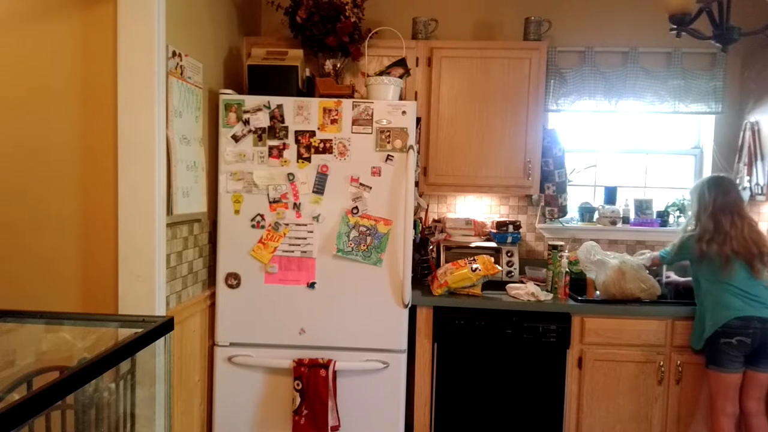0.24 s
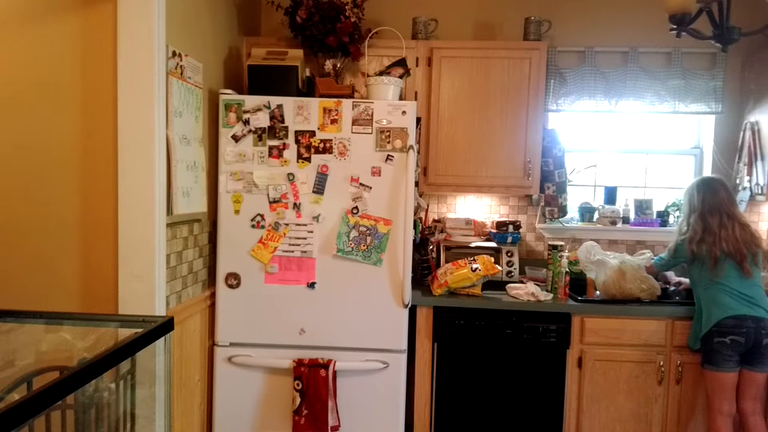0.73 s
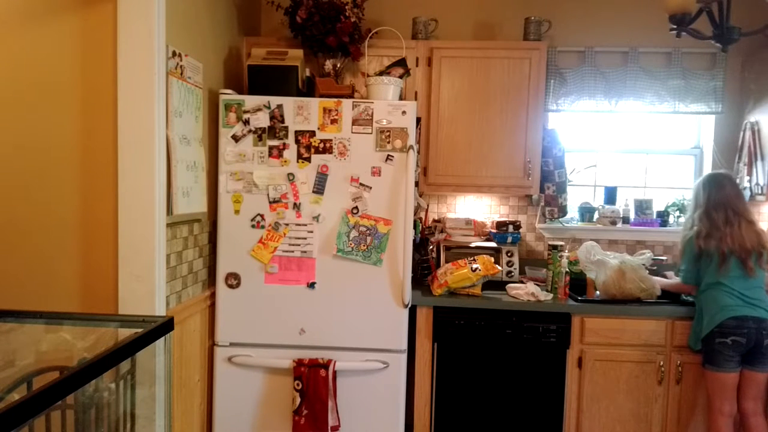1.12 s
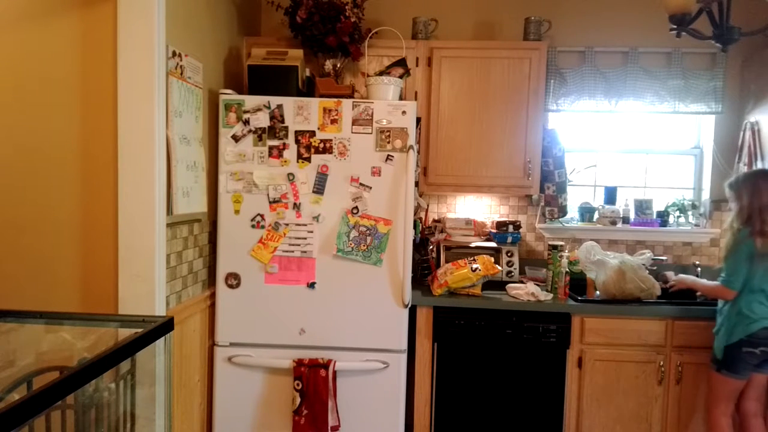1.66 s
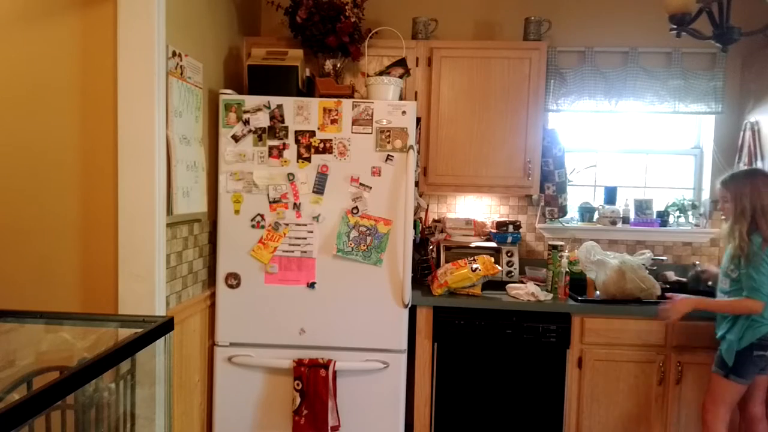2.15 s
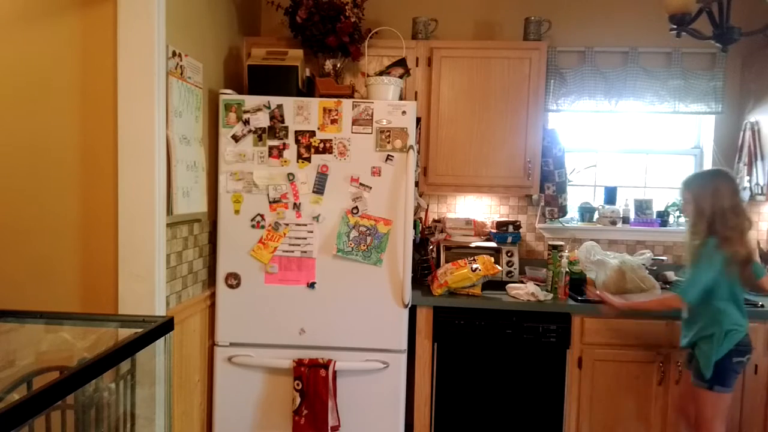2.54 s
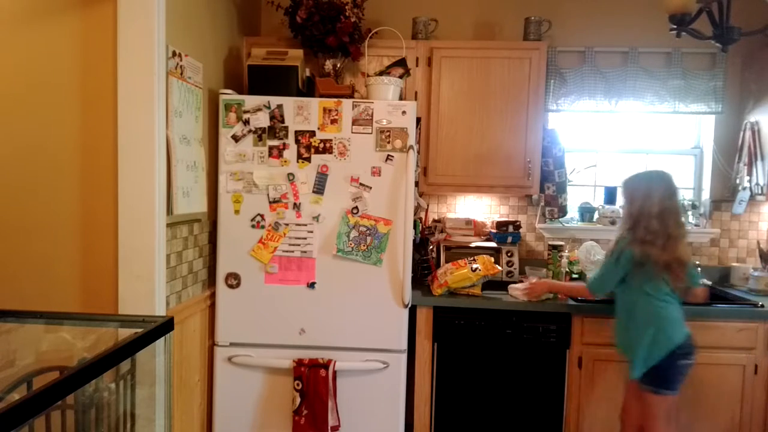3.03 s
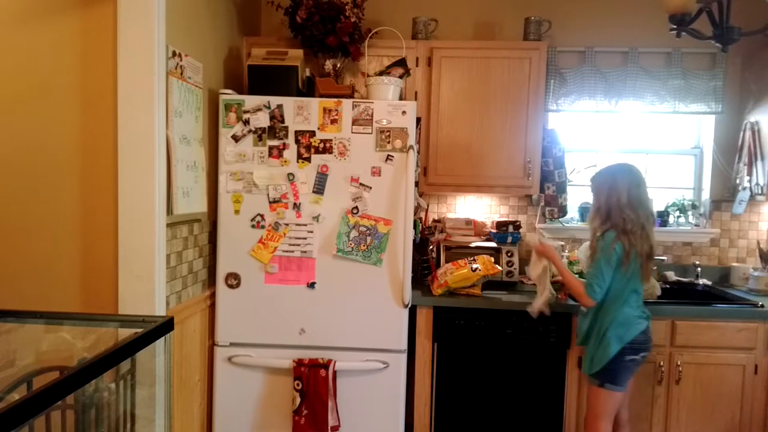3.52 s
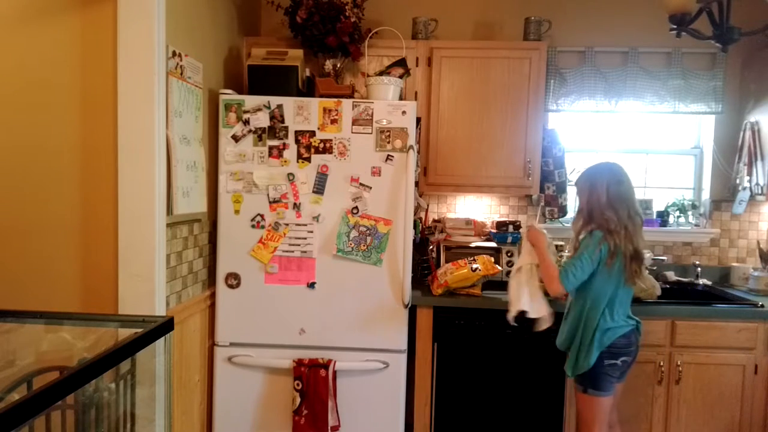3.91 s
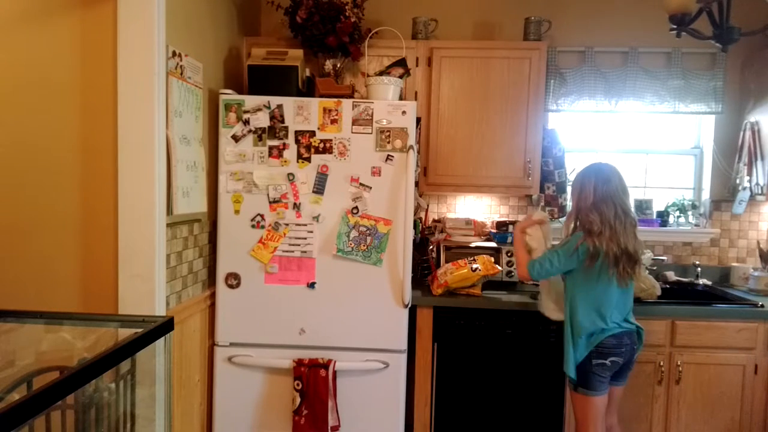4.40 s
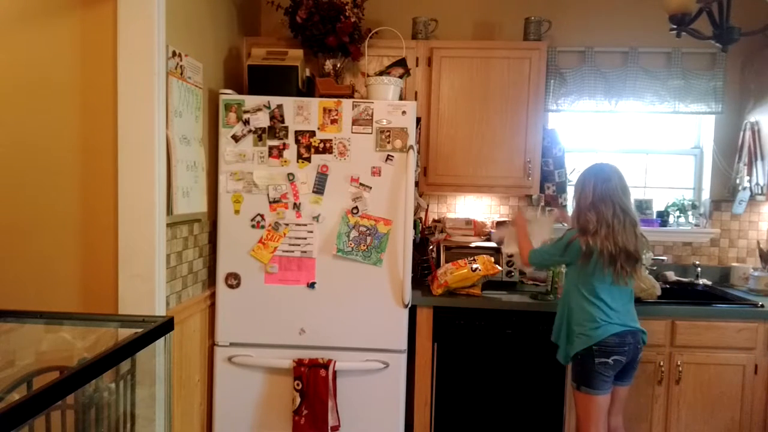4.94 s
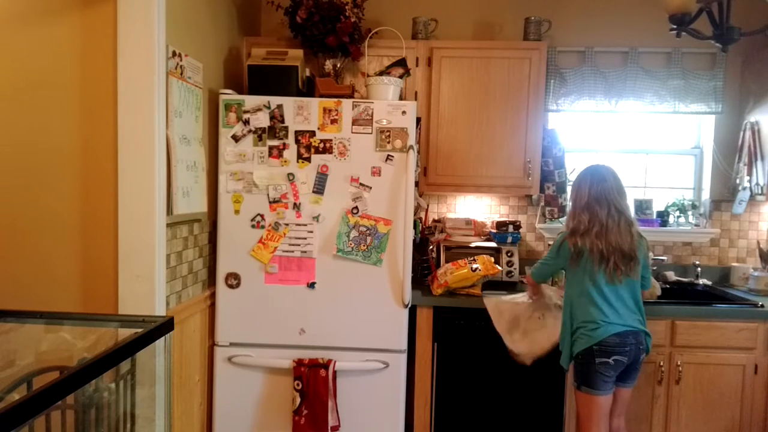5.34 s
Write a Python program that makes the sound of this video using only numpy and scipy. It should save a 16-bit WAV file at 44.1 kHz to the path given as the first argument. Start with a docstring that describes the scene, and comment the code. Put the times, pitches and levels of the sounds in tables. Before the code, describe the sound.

In a small home kitchen, heard from across the room, a tap hisses, splashes and gurgles for about a second, with a thin high whistle as it is shut. Three strong, evenly spaced knocks of a dish on the sink follow. Then come dull footsteps, soft swishes of cloth, a quick run of lighter crockery clacks, and near the end faint steps and another cloth flap. Low hum and faint room noise underneath.

```python
"""A kitchen heard by a far stereo microphone that gets mostly the room, over a low hum and a noise floor.
First a tap hisses, whistles as its valve pinches the jet and is shut, with splashes and gurgling (filtered noise)
and bubbles (rising sines). Then a dish is knocked three times on the sink (ringing modes and a crack).
Feet thud (coloured clicks, floor ring) and a cloth rustles (swells of noise), with a few ticks; crockery
clacks (modes again); a few steps and swishes of cloth close the scene."""
import sys
import numpy as np
from scipy import signal
from scipy.fft import rfft, irfft
from scipy.io import wavfile
from scipy.ndimage import uniform_filter1d

SR = 44100
rng = np.random.default_rng(int(sys.argv[2]) if len(sys.argv) > 2 else 0)


def digitize_waveform(pressure):
    """Quantize a signal to 16-bit integers and store it at the path in sys.argv[1].

    Rows of a 2-D input are taken as channels; values are limited to [-1, 1].
    """
    field = np.atleast_2d(pressure).T
    bounded = np.clip(field, -1, 1)
    quanta = np.round(bounded * 32767).astype(np.int16)
    wavfile.write(sys.argv[1], SR, quanta)


N = 245716

# Levels of events are source levels, ahead of the room and the microphone. Spectra are in dB per Hz.
# steady noise floor of the place: pitch_hz, level_db
FLOOR_SPECTRUM = [(18, -42), (30, -20), (53, -5.5), (71, -12), (86, -10), (161, -11), (188, -14),
                  (294, -13), (326, -16.5), (424, -10), (662, -20.5), (1030, -18.5), (1610, -27),
                  (1890, -30), (15800, -44)]
FLOOR_DB = -59
# low hum: pitch_hz, width_hz, level_db
HUM_PEAKS = [(57.55, 4.2, -66)]

# early echoes from the counter and the near wall: delay_s, level_db over the direct sound
NEAR_ECHOES = [(.0035, 5.5), (.007, 0), (.011, -2)]
# decay of the room's tail: pitch_hz, t60_s
ROOM_DECAY = [(100, 0.4), (500, 0.33), (1500, 0.39), (4000, 0.4), (8000, 0.35), (14000, 0.52)]
# likeness of the left and right noise: pitch_hz, likeness (0 to 1)
STEREO_LIKENESS = [(30, 0.89), (300, 0.87), (640, 0.78), (1400, 0.18), (3100, 0), (15000, 0)]
# balance of the microphone's two ports: pitch_hz, left_minus_right_db
PORT_BALANCE = [(60, 1.5), (110, -2.5), (200, 3.5), (380, 1), (700, 1.5), (1290, 4), (2380, 5.5),
                (4400, -5.5), (8120, -6), (15000, -1)]
BAND_LIMIT_HZ = 15850
OFFSET = .0008  # steady offset of the converter, full scale 1

# swishes of cloth and clothes: peak_s, hiss_level_db, rise_db_per_s, body_over_hiss_db
CLOTH_SWISHES = [(2.335, -69, 901, 3), (2.48, -63.5, 60, 1.5), (2.62, -71, 200, 6.5),
                 (2.81, -67.5, 799.5, 8), (2.99, -64, 899, 8.5), (3.04, -65.5, 300, 1),
                 (3.16, -69, 200, 3.5), (3.45, -68, 498.5, 0.5), (3.56, -72, 400, 6.5),
                 (3.73, -74, 499.5, 4), (5.2, -77.5, 300, 7), (5.34, -78, 900.5, 6), (5.485, -62, 450, 4),
                 (5.57, -59.5, 123, 11.5)]
SWISH_FALL_DB_PER_S = 110
# hiss of the fabric: pitch_hz, level_db
CLOTH_HISS = [(2500, -5.5), (3500, 0), (5500, -3.5), (8000, -3), (10500, -1), (12500, -7), (15800, -9)]
# lower body of the folds: pitch_hz, level_db
CLOTH_BODY = [(350, -7.5), (750, -2), (1500, -3), (2300, -3.5), (3800, -24)]

# feet on the floor: start_s, level_db, centre_hz, slap_db, floor_boom_db
FOOTFALLS = [(2.322, -24, 370, -36, -26.5), (2.973, -37, 500, -28, -2.5), (2.98, -22, 310, -34, -32),
             (3.544, -33.5, 389, -48.5, -23), (4.32, -43.5, 190, -31.5, -25), (5.379, -44, 160, -16.5, -20),
             (5.424, -48.5, 110, -35, -19)]
# ring of the floor boards under a foot: pitch_hz, level_db, t60_s
BOARD_MODES = [(253, -9.5, 0.16), (467.4, -4.5, 0.15), (591, -5, 0.1)]

# crockery clacks: start_s, level_db, ring_db, then the tint of the spot struck: base_db, body_db, edge_db
CLACKS_STRUCK = [(3.777, -28.5, 0, 3, 0, -1.5), (3.811, -33, 1.5, 6.5, 1, -22),
                 (3.832, -33, -8, 7.5, 0.5, -21), (3.892, -35.5, -8, 4.5, 9, -18),
                 (3.945, -32, -12, 7.5, 0.5, 25), (3.9555, -25.5, -13, 1, -12, 10)]
# ringing modes of the crockery: pitch_hz, level_db, t60_s, build_up_s
CROCKERY_MODES = [(638, -10, 0.091, 0.0042), (735, -18, 0.064, 0.0075), (845, -3, 0.14, 0.0032),
                  (1047, -12, 0.051, 0.004), (1492, -8, 0.07, 0.0017), (2310, -26, 0.063, 0.0022),
                  (3990, -22, 0.076, 0.0014), (5545, -19.5, 0.06, 0.0014), (8670, -51, .2, 0.0017)]
# crack of crockery on contact: pitch_hz, level_db
CROCKERY_CRACK_SPECTRUM = [(59, -31), (100, -14.5), (129, -9.5), (189, -20.5), (254, -10), (522, -7.5),
                           (645, -1.5), (1500, -13), (3510, -28), (15800, -49)]
# centres of the crockery's spot tints: base_hz, body_hz, edge_hz
CROCKERY_SPOTS = (1610, 4000, 10300)

# splashes and small ticks: start_s, level_db, centre_hz, t60_s
SPLASH_BURSTS = [(0.155, -28, 7150, 0.019), (0.312, -44, 6640, 0.032), (0.4523, -35, 9030, 0.036),
                 (0.757, -31.5, 6220, 0.025), (0.792, -27.5, 4200, 0.023), (0.8872, -36, 3280, 0.026),
                 (2.3245, -46.5, 5600, 0.019), (2.468, -50, 8400, 0.037), (2.798, -53, 8800, 0.076),
                 (2.812, -62.5, 10100, 0.05), (3.0006, -54, 9200, 0.061), (5.3394, -64.5, 6100, 0.062)]
# bubbles and drips: start_s, level_db, starting pitch_hz
BUBBLE_DRIPS = [(.512, -48.5, 2140), (0.572, -37, 1767), (0.601, -40, 1870), (.612, -39, 2080),
                (0.659, -44, 1415), (0.676, -41, 1055), (1.068, -69, 8260), (1.165, -61, 3300),
                (1.167, -59, 2410), (1.19, -57.5, 2000), (1.195, -65, 3340)]
BUBBLE_T60_S = 0.067

# water leaving the tap, with two spurts: time_s, flow_db
TAP_FLOW = [(0.0, -51), (0.14, -52), (0.166, -46.5), (0.25, -59.5), (0.42, -55.5), (0.496, -44.5),
            (0.7, -46.5), (0.753, -49.5), (0.758, -42), (0.88, -55), (1.05, -85)]
# hiss of the spray: pitch_hz, level_db
SPRAY_SPECTRUM = [(1500, -15), (2700, -4.5), (4500, -2.5), (7500, -6), (10000, -9), (14000, -18.5)]
# hiss of the mist: pitch_hz, level_db
MIST_SPECTRUM = [(5000, -25), (8000, -4), (10500, 1), (14000, -4.5), (15800, -10)]
MIST_DB, MIST_FALL_DB_PER_S, SHUT_S = -5.5, 60, 0.77  # against the flow; it thins faster once the tap is shut
# water in the drain: time_s, gurgle_db, centre_hz of a wandering resonance
DRAIN_WATER = [(0.0, -62, 1600), (0.25, -60.5, 1200), (0.44, -62.5, 1230), (0.496, -53, 1830),
               (0.642, -57, 2080), (0.684, -48, 1240), (0.712, -69, 1200), (0.82, -64, 1900),
               (1.03, -74, 1200)]
# fixed part of the gurgle: pitch_hz, level_db
GURGLE_SPECTRUM = [(700, -0.5), (1000, 4), (1800, 1.5), (2600, -1), (3500, -52)]
# the valve pinching the jet: full_from_s, full_until_s, level_db
VALVE_SQUEEZE = (0.492, 0.63, -38.5)
SQUEEZE_RISE_DB_PER_S, SQUEEZE_FALL_DB_PER_S, SQUEEZE_MIST_DB = 604, 153, -4
# whistling resonances of the valve: pitch_hz, width_hz, level_db
VALVE_WHISTLE = [(9005, 140, 0.5), (9470, 430, -8), (10900, 530, -15), (7260, 140, -12), (6130, 1600, -6.5)]
WHISTLE_ENDS_S, WHISTLE_CUT_DB_PER_S = .69, 700

# dish on the sink: start_s, level_db, ring_db, then the spot's tint: base_db, body_db, edge_db, rim_db
DISH_KNOCKS = [(1.401, -12.5, -5, 5, 5, -5, 2.5), (1.635, -17, 6, 2, -17, -6, 5),
               (1.874, -11.5, 3.5, -2, -2.5, 3, -1.5)]
# ringing modes, with a close pair that swells, then beats: pitch_hz, level_db, t60_s, build_up_s
SINK_MODES = [(297, -27, 0.31, .004), (318, -12, 0.18, 0.0049), (357.6, -9.5, 0.13, 0.0045),
              (526, 14, .175, .14), (531, 14, .175, .14), (616, -32.5, 0.24, 0.0082),
              (604.3, -10.5, 0.18, 0.0016), (707, -28, 0.1, 0.002), (758, -6, 0.072, 0.0065),
              (840, -10, 0.22, 0.0019), (1100, -18.5, .12, .004), (1180, -18.5, 0.075, 0.01),
              (1456, -6.5, 0.12, 0.0046), (1540, -11, 0.15, 0.0012), (1750, -33, .15, 0.0063),
              (1900, -22, 0.11, .004), (2016, -37, .15, .004), (2230, -19, 0.077, 0.0069)]
# crack of the dish on the sink: pitch_hz, level_db
SINK_CRACK_SPECTRUM = [(60, -68), (130, -33), (200, -12), (320, -1.5), (440, -3.5), (600, -2.5),
                       (900, -4.5), (1500, -7.5), (2500, -18.5), (4000, -26), (7000, -40.5), (10000, -47),
                       (15800, -56.5)]
# centres of the sink's spot tints: base_hz, body_hz, edge_hz, rim_hz
SINK_SPOTS = (330, 900, 4000, 10000)
SPOT_OCTAVES = 0.56  # reach of a spot's tint


def gain_of(db):
    """dB to gain."""
    return 10 ** (np.asarray(db) / 20)


def evened(x):
    """Scales to rms 1."""
    return x / np.sqrt(np.mean(x ** 2) + 1e-20)


def read(points, hz):
    """Reads a table on a log-frequency axis."""
    f, value = np.transpose(points)
    return np.interp(np.log(hz + 1), np.log(f + 1), value)


def add(mix, s, sound):
    """Mixes a sound in at time s."""
    part = mix[..., round(s * SR):][..., :sound.shape[-1]]
    part += sound[..., :part.shape[-1]]


def tinted(x, points):
    """Filters by a spectrum in dB."""
    n = x.shape[-1]
    gain = gain_of(read(points, np.fft.rfftfreq(n, 1 / SR)))
    return irfft(rfft(x) * gain, n)


def pair(n):
    """Two noises, alike in the bass and unrelated in the treble."""
    a, b = rfft(rng.standard_normal((2, n)))
    same = np.clip(read(STEREO_LIKENESS, np.fft.rfftfreq(n, 1 / SR)), -1, 1)
    return irfft([a, same * a + np.sqrt(1 - same ** 2) * b], n)


def level(rows, column):
    """A dB column as a gain over time, silent outside its rows."""
    rows = np.array(rows)
    return gain_of(np.interp(np.arange(N) / SR, rows[:, 0], rows[:, column], -200, -200))


def swell(start, end, top_db, rise, fall):
    """A gain that climbs to its top, holds from start to end and falls; slopes in dB per s."""
    t = np.arange(N) / SR
    return gain_of(top_db - rise * np.maximum(start - t, 0) - fall * np.maximum(t - end, 0))


def flicker(depth_db, size):
    """A random gain of the given rms depth, smoothed over size samples."""
    return gain_of(depth_db * evened(uniform_filter1d(rng.standard_normal(N), size)))


def fuzzy_tones(peaks, unsteady_db):
    """Noise through narrow resonances, each coming and going by itself."""
    hz = np.fft.rfftfreq(N, 1 / SR)
    out = np.zeros((2, N))
    for f, width, db in peaks:
        tone = irfft(rfft(pair(N)) / (1 + (2 * (hz - f) / width) ** 2), N)
        out += gain_of(db) * evened(tone * flicker(unsteady_db, size=1500))
    return out


def click(colour):
    """A causal pulse of energy 1 with the colour in dB (minimum phase)."""
    log_gain = np.log(gain_of(read(colour, abs(np.fft.fftfreq(4096, 1 / SR)))))
    pulse = np.fft.ifft(np.exp(np.conj(signal.hilbert(log_gain)))).real[:2048]
    return pulse / np.linalg.norm(pulse)


def room(x, direct_db, tail_db):
    """Direct sound and near echoes, then a diffuse tail dying band by band; each call draws its own tail."""
    hz, t, z = signal.stft(pair(SR // 2), SR, nperseg=256)
    decay = gain_of(-60 * t / read(ROOM_DECAY, hz)[:, None])
    tail = signal.istft(z * decay, SR, nperseg=256)[1]
    t = np.arange(tail.shape[1]) / SR
    tail = tail * np.clip(t / 0.0078, 0, 1) * (1 + 1.14 * np.exp(-t / 0.027))  # soft onset, denser start
    spectrum = rfft(tail)
    spectrum = spectrum / np.sqrt(uniform_filter1d(abs(spectrum) ** 2, size=40))  # a dense room favours no band
    fade_out = np.clip(10 * (t[-1] - t - .1), 0, 1)
    reply = irfft(spectrum, len(t)) * gain_of(tail_db) * fade_out
    for s, db in [(0.0022, 0)] + NEAR_ECHOES:  # the direct sound leads
        add(reply, s + 0.0014 * rng.random(), gain_of([[direct_db + db]]))
    return signal.fftconvolve(x[None], reply, axes=1)


def floor_and_hum():
    """Steady coloured noise of the place, and a low hum made of narrow unsteady noise."""
    floor = gain_of(FLOOR_DB) * evened(tinted(pair(N), FLOOR_SPECTRUM))
    return floor + fuzzy_tones(HUM_PEAKS, 3.4)


def rustle():
    """Grainy friction of fabric, one swell for each swish."""
    hiss = evened(tinted(pair(N), CLOTH_HISS) * flicker(1.6, size=200))
    body = evened(tinted(pair(N), CLOTH_BODY) * flicker(2.4, size=300))
    power = np.array([swell(s, s, db, rise, SWISH_FALL_DB_PER_S) ** 2 for s, db, rise, _ in CLOTH_SWISHES])
    body_power = gain_of(np.array(CLOTH_SWISHES)[:, -1]) ** 2 @ power
    return np.sqrt(power.sum(0)) * hiss + np.sqrt(body_power) * body


def steps():
    """A dull push, a faint slap of the sole and the boards' ring and boom."""
    out, t = np.zeros((2, N)), np.arange(16384) / SR
    for s, db, hz, slap_db, boom_db in FOOTFALLS:
        colour = [(hz * 0.071, -40), (hz * 0.26, -10.5), (hz, 0), (hz * 1.7, -7),
                  (hz * 5.8, slap_db), (12000, slap_db - 48)]
        add(out, s, gain_of(db + 21.5) * room(click(colour), -14.5, 0))
        boom = gain_of(boom_db - 60 * t / .5) * np.sin(2 * np.pi * 33 * t) * np.minimum(t / 0.049, 1)
        ring = sum(gain_of(b_db + read(colour, b_hz) - 60 * t / t60) * np.sin(2 * np.pi * b_hz * t)
                   for b_hz, b_db, t60 in BOARD_MODES)
        add(out, s, gain_of(db) * (boom + ring * np.minimum(t / 0.0065, 1))[None])
    return out


def blows(rows, modes, crack, spot_hz, crack_db, wet_db, direct_db):
    """Each blow rings the modes and sends a crack into the room; the spot struck tints both."""
    out, t = np.zeros((2, N)), np.arange(16384) / SR
    lags = 0.15 * rng.choice([-1, 1], len(modes))  # radians: a mode reaches the two ports a little out of step
    for s, db, ring_db, *spot in rows:
        def tint(hz):
            return sum(d * np.exp(-(np.log2(hz / f) / SPOT_OCTAVES) ** 2) for f, d in zip(spot_hz, spot))
        ring = np.zeros((2, len(t)))
        for (hz, mode_db, t60, build_up), lag in zip(modes, lags):
            envelope = gain_of(mode_db + tint(hz) - 60 * t / t60) * (1 - np.exp(-t / build_up))
            ring += envelope * np.sin(2 * np.pi * hz * t + np.array([[lag], [-lag]]))
        add(out, s, gain_of(db + ring_db) * ring)
        add(out, s, gain_of(db + ring_db) * room(ring[0], -38.5, wet_db))
        snap = click([(hz, c_db + tint(hz)) for hz, c_db in crack])
        add(out, s, gain_of(db + crack_db) * room(snap, direct_db, 0))
    return out


def crockery():
    """Clacks of crockery: short damped modes and a contact crack."""
    return blows(CLACKS_STRUCK, CROCKERY_MODES, CROCKERY_CRACK_SPECTRUM, CROCKERY_SPOTS,
                 crack_db=27.0, wet_db=-0.5, direct_db=-17.0)


def splashes():
    """Short bright bursts of noise and single ringing bubbles."""
    out, t = np.zeros((2, N)), np.arange(8192) / SR
    for s, db, hz, t60 in SPLASH_BURSTS:
        burst = rng.standard_normal(len(t)) * gain_of(-60 * t / t60) * np.minimum(t / 0.0027, 1)
        colour = [(hz * 0.29, -26), (hz, 0), (hz * 1.34, -12), (hz * 1.5, -30)]
        burst = signal.fftconvolve(burst, click(colour))
        add(out, s, gain_of(db) * room(burst, -14.0, -5.0))
    for s, db, hz in BUBBLE_DRIPS:
        bubble = np.minimum(t / 0.00083, 1) * np.sin(2 * np.pi * hz * t * (1 + 0.37 * t))  # the pitch rises
        rough_skin = 1 + .5 * evened(uniform_filter1d(rng.standard_normal(len(t)), size=120))
        bubble = bubble * rough_skin
        add(out, s, room(gain_of(db - 60 * t / BUBBLE_T60_S) * bubble, -11.5, 0))
    return out


def tap():
    """Noise of spray and mist, the drain's gurgle and the pinched valve's whistle, each unsteady."""
    flow = level(TAP_FLOW, column=1)
    squeeze = swell(*VALVE_SQUEEZE, SQUEEZE_RISE_DB_PER_S, SQUEEZE_FALL_DB_PER_S)
    flow_mist = flow * swell(0, SHUT_S, MIST_DB, 0, MIST_FALL_DB_PER_S)
    mist_gain = np.hypot(flow_mist, gain_of(SQUEEZE_MIST_DB) * squeeze)
    spray = flow * evened(tinted(pair(N), SPRAY_SPECTRUM) * flicker(2.0, size=150))
    mist = mist_gain * evened(tinted(pair(N), MIST_SPECTRUM) * flicker(1.7, size=150))

    s, _, hz = np.transpose(DRAIN_WATER)
    turn = np.exp(2j * np.pi * np.cumsum(np.interp(np.arange(N) / SR, s, hz)) / SR)
    hollow = (tinted(pair(N), [(120, -10.0), (500, -9), (1500, -31)]) * turn).real  # a resonance that wanders
    water = evened(tinted(pair(N), GURGLE_SPECTRUM)) + 0.89 * evened(hollow)
    gurgle = level(DRAIN_WATER, column=1) * evened(water)

    whistle_gain = squeeze * swell(0, WHISTLE_ENDS_S, 0, 0, WHISTLE_CUT_DB_PER_S)
    whistle = whistle_gain * fuzzy_tones(VALVE_WHISTLE, 2.9) * flicker(0.81, size=300)
    return spray + mist + gurgle + whistle


def dish_on_sink():
    """Three knocks of a dish on the sink: damped modes and a contact crack."""
    return blows(DISH_KNOCKS, SINK_MODES, SINK_CRACK_SPECTRUM, SINK_SPOTS,
                 crack_db=27.0, wet_db=-7.5, direct_db=-16.0)


def scene():
    """All sources, from the background of the place to the dish."""
    return floor_and_hum() + rustle() + steps() + crockery() + splashes() + tap() + dish_on_sink()


def record(dry):
    """The two microphone ports lean left in the mids and right in the treble; then the band limit and offset."""
    left = tinted(dry[0], [(f, db / 2) for f, db in PORT_BALANCE])
    right = tinted(dry[1], [(f, -db / 2) for f, db in PORT_BALANCE])
    low_pass = signal.firwin(511, BAND_LIMIT_HZ, window=("kaiser", 9), fs=SR)
    return OFFSET + signal.oaconvolve(np.array([left, right]), low_pass[None], "same")


dry = scene()
out = record(dry)
digitize_waveform(out)
```